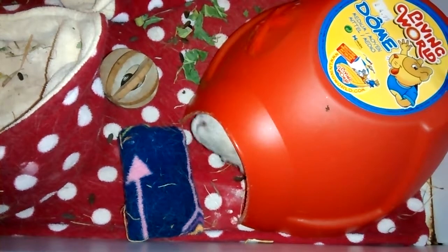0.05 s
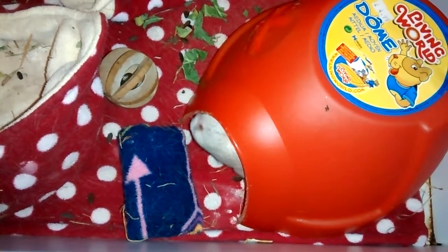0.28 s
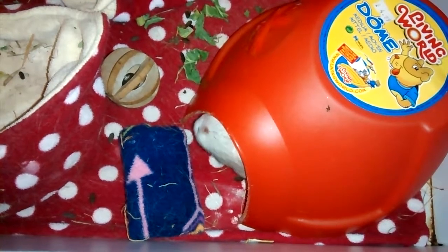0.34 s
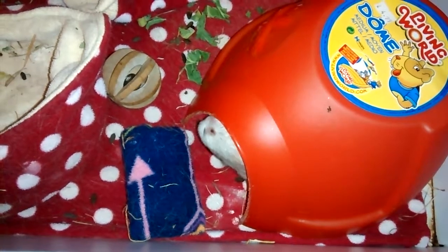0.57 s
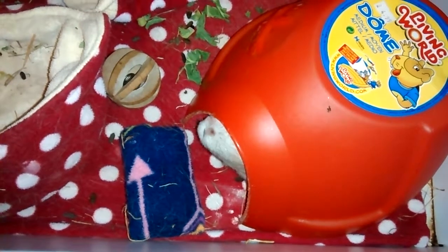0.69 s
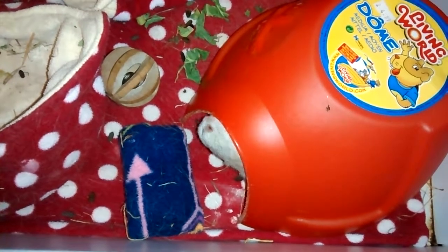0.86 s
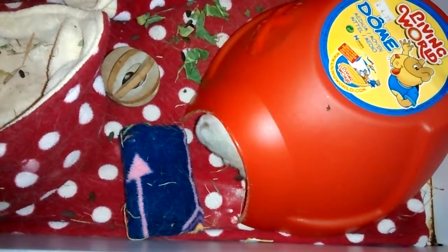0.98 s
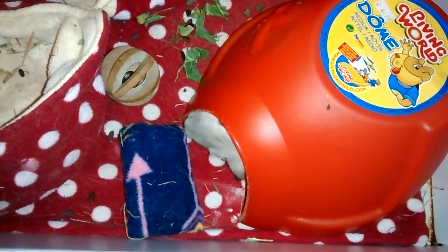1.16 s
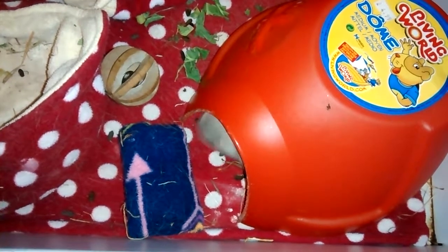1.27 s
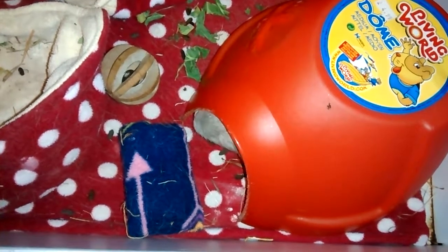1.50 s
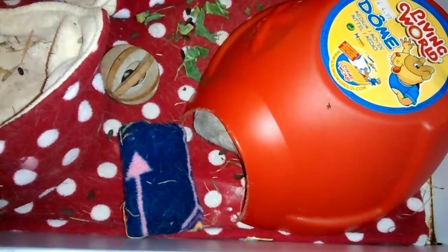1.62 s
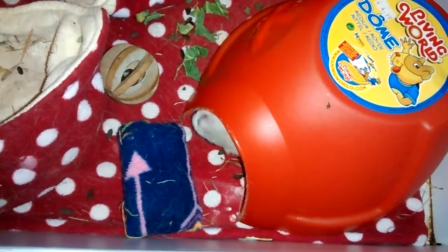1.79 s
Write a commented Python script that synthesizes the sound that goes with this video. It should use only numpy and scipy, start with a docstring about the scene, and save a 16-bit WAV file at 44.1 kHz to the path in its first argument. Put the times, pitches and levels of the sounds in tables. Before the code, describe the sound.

A guinea pig gives four short, low grunts inside a plastic dome in a quiet room.

```python
"""A guinea pig gives four short, low grunts from inside a plastic dome in a quiet room.
Each grunt is a few pops of the throat: a hollow ring near 300 Hz, a brief rasp and a faint tick.
The dome rings along, and both the dome and the room throw the grunts back as echoes.
Behind them are a low appliance hum, soft room noise and the hiss of a nearby camera's microphones."""
import sys
import numpy as np
from scipy import signal
from scipy.fft import rfft, irfft
from scipy.io import wavfile

SR = 44100
rng = np.random.default_rng(int(sys.argv[2]) if len(sys.argv) > 2 else 0)


def log_audio(samples):
    """Write samples as a 16-bit WAV file to the path given in sys.argv[1]."""
    # one column per channel
    frames = np.atleast_2d(samples).T
    # limit to full scale, then quantise
    limited = np.clip(frames, -1, 1)
    pcm = np.round(limited * 32767).astype(np.int16)
    wavfile.write(sys.argv[1], SR, pcm)


N = 81585  # 1.85 seconds


def amp(db):
    """Turns decibels (dB) into a number to multiply a sound by."""
    return 10 ** (np.asarray(db) / 20)


def unit(x):
    """Scales a sound to an average strength (rms) of 1."""
    return x / np.sqrt(np.mean(x ** 2) + 1e-20)


def read(points, hz, column=1):
    """Looks up a frequency in a table, sliding smoothly between the rows."""
    table = np.array(points)
    return np.interp(np.log(hz + 1), np.log(table[:, 0] + 1), table[:, column])


def add(mix, start_s, sound):
    """Adds a sound to the mix at the given time."""
    part = mix[round(start_s * SR):][:len(sound)]
    part += sound[:len(part)]


def pan(x, left_db):
    """Makes two channels: the left is raised by left_db and the right lowered as much."""
    return np.array([x * amp(left_db), x * amp(-left_db)])


def noise(spectrum):
    """Steady noise, with its lows and highs shaped by a table."""
    gain = amp(read(spectrum, np.fft.rfftfreq(N, 1 / SR)))
    return unit(irfft(rfft(rng.standard_normal(N)) * gain, N))


# How loud the hum is. Each row: time in seconds, level in dB.
HUM_LEVELS = [(0.0, -55), (0.426, -49.5), (0.534, -50), (1.092, -49), (1.236, -51.5), (1.812, -52.5),
              (1.85, -52)]

def hum(pitch_hz=45.2, left_lead_s=.0026):
    """An appliance hums on one low note, stronger and earlier on the left."""
    t = np.arange(N) / SR
    tone = unit(np.sin(2 * np.pi * pitch_hz * np.array([t + left_lead_s, t])))
    level_db = np.interp(t, *np.transpose(HUM_LEVELS))
    return pan(amp(level_db), left_db=3.3) * tone


# The tone of the background noise. Each row: frequency in Hz, relative level in dB.
AIR_SPECTRUM = [(20, 10.5), (35, -5), (70, 7), (110, -0.5), (135, 9), (160, 14), (195, 3), (300, 6),
                (500, 1.5), (1000, -6), (1700, -7), (2100, -9.5), (3000, -7.5), (3900, -6.5), (5000, -12.5),
                (6500, -9), (7600, -13), (9000, -11), (15000, -13)]
# How alike its two sides are. Each row: frequency in Hz, likeness (1 the same, -1 opposite).
AIR_LIKENESS = [(60, 0.57), (150, -0.36), (380, -0.48), (950, 0.93), (2380, -0.14), (5980, 0.022),
                (15000, -0.082)]
# Which way it leans. Each row: frequency in Hz, left level minus right level in dB.
AIR_BALANCE = [(60, 6.0), (180, 2.5), (550, 0.5), (1650, -1.0), (4970, -0.5), (15000, 0.0)]
# How its loudness drifts. Each row: time in seconds, change in dB.
AIR_DRIFT = [(0, -0.9), (.2, -1), (.36, 2), (.8, 2.06), (1.15, 2.14), (1.27, -0.04), (1.85, 0.9)]

def room_noise_and_hiss(level_db=-56.5, hiss_drift_share=0.87):
    """Soft room noise and the hiss of two microphones drift gently in loudness."""
    hz = np.fft.rfftfreq(N, 1 / SR)
    left, separate = rfft(noise(AIR_SPECTRUM)), rfft(noise(AIR_SPECTRUM))
    likeness = np.clip(read(AIR_LIKENESS, hz), -1, 1)
    right = likeness * left + np.sqrt(1 - likeness ** 2) * separate
    lean = amp(read(AIR_BALANCE, hz) / 2)
    both = irfft(np.array([left * lean, right / lean]), N)
    room_noise = signal.sosfiltfilt(signal.butter(2, 2000, fs=SR, output="sos"), both)
    hiss = both - room_noise  # the part above 2000 Hz
    drift_db = np.interp(np.arange(N) / SR, *np.transpose(AIR_DRIFT))
    return amp(level_db) * (room_noise * amp(drift_db) + hiss * amp(hiss_drift_share * drift_db))


def ring(t, hz, rise_s, fade_s):
    """A tone that swells quickly and dies away. A fade time is how long it takes to drop 60 dB."""
    swell = (1 - np.exp(-t / rise_s)) ** 2
    fade = np.exp(-np.log(1000) * t / fade_s)
    return -swell * fade * np.sin(2 * np.pi * hz * t)


def puff(t, length_s, spectrum, rise_s=.0004):
    """A small burst of air: noise that rises and falls quickly."""
    shape = (1 - np.exp(-t / rise_s)) * np.exp(-t / length_s)
    strength = np.sqrt(np.mean(shape ** 2)) / shape.max()
    return strength * unit(shape * noise(spectrum)[:len(t)])


# The tone of the breathy rasp. Each row: frequency in Hz, relative level in dB.
RASP_SPECTRUM = [(100, -19), (200, -8), (450, -4), (650, -1), (880, 1), (1050, -2), (1350, 0), (1850, -4),
                 (2300, -19), (3500, -36), (6000, -50)]
# The tone of the brighter tick. Each row: frequency in Hz, relative level in dB.
TICK_SPECTRUM = [(1000, -24), (2200, -7), (3100, 0), (3800, -3), (4500, 0), (5000, -13), (5800, -30),
                 (9000, -55), (15000, -70)]
# The pops that make up the grunts. Each row: start in seconds, throat pitch in Hz, throat level in dB,
# swell time in seconds, throat fade time in seconds, chest level in dB, rasp level in dB, rasp length
# in seconds, mouth pitch in Hz, mouth level in dB, tick level in dB, tick length in seconds.
THROAT_POPS = [ (.2080, 325, -14.5, 0.003, 0.035, -31.5, -34.5, 0.00099, 1520, -42, -46.5, 0.0011),
               (0.2343, 303.3, -8, 0.0064, 0.054, -38, -36, 0.0053, 814, -16.5, -48, 0.0064),
               (0.4043, 303, -11.5, 0.0031, 0.033, -55, -38, 0.0015, 1410, -30, -43.5, 0.00067),
               (0.4219, 369, -18, 0.0021, 0.0367, -28.5, -42.5, 0.0031, 668, -17.5, -60, 0.0017),
               (0.4332, 289.5, -20, .0015, 0.056, -54, -39.5, 0.0033, 1114, -23, -50.5, .002),
               (0.4474, 280, -35, 0.0017, 0.05, -49, -44, 0.0028, 895, -40, -42.5, 0.00067),
               (0.5885, 376, -19.5, 0.0023, 0.032, -30, -40, 0.0054, 1100, -34, -55.5, 0.0023),
               (0.5987, 283.5, -27, 0.0019, .075, -47, -40, .0035, 1328, -30, -49.5, 0.0027),
               (0.7275, 280, -13, 0.002, 0.025, -36, -35, 0.001, 1470, -28, -45.5, 0.0013),
               (0.7416, 315, -29.5, 0.0016, 0.065, -48, -44, 0.0026, 1510, -21.5, -39.5, 0.0026)]

def grunts(low_cut_hz=106, tick_right_db=1, left_lag_s=.0001):
    """Each pop rings the throat, chest and mouth and lets out a puff of rasp with a tick on top."""
    body, mouth, ticks = np.zeros(N), np.zeros(N), np.zeros((2, N))
    t = np.arange(SR // 5) / SR
    for (start, throat_hz, throat_db, swell_s, fade_s, chest_db,
         rasp_db, rasp_s, mouth_hz, mouth_db, tick_db, tick_s) in THROAT_POPS:
        add(body, start, amp(throat_db) * ring(t, throat_hz, swell_s, fade_s))
        add(body, start, amp(chest_db) * ring(t, hz=167, rise_s=swell_s, fade_s=0.061))
        add(mouth, start, amp(mouth_db) * ring(t, mouth_hz, rise_s=.0008, fade_s=.009))
        add(mouth, start, amp(rasp_db) * puff(t, rasp_s, RASP_SPECTRUM))
        # The ticks lean to the right and reach each microphone differently.
        for side, lean_db in zip(ticks, (-tick_right_db, tick_right_db)):
            add(side, start, amp(tick_db + lean_db) * puff(t, tick_s, TICK_SPECTRUM))
    # So small an animal gives off little bass.
    body = signal.sosfilt(signal.butter(2, low_cut_hz, "high", fs=SR, output="sos"), body)
    left, right = pan(body, left_db=1.74) + pan(mouth, left_db=-1.1) + ticks
    clock = np.arange(N) / SR
    late_left = np.interp(clock - left_lag_s, clock, left)
    return np.array([late_left, right])


def echoes(x, bands, delay_s, likeness):
    """Many reflections blur into a fading tail. A likeness of 1 gives both sides the same tail."""
    shared, left, right = rng.standard_normal((3, SR // 2))
    scatter = np.sqrt(likeness) * shared + np.sqrt(1 - likeness) * np.array([left, right])
    hz, t, slices = signal.stft(scatter, SR, nperseg=256)  # split into frequency bands
    fade_rate = np.log(1000) / read(bands, hz, column=2)[:, None]
    fade = np.sqrt(2 * fade_rate / SR) * np.exp(-fade_rate * t)  # same energy, short or long
    slices = slices * amp(read(bands, hz))[:, None] * fade
    tail = signal.istft(slices, SR, nperseg=256)[1]
    late_tail = np.pad(tail, ((0, 0), (round(delay_s * SR), 0)))
    return signal.fftconvolve(x, late_tail, axes=1)[:, :N]


# Echoes inside the dome. Each row: frequency in Hz, level in dB, fade time in seconds.
DOME_ECHOES = [(151, -52, 0.021), (343, -38, 0.019), (710, -6.5, 0.041), (1440, -3.5, 0.068),
               (4070, -11, 0.037)]
# The notes the dome rings at. Each row: pitch in Hz, level in dB, fade time in seconds.
DOME_NOTES = [(341, -19, 0.66), (574, -3.5, 0.052), (694, -9, 0.072), (918, -9.5, 0.051), (1236, -8, 0.09),
              (1630, -19, 0.28)]

def dome(voice):
    """The plastic dome scatters the voice in quick reflections and rings at its own notes."""
    answer = echoes(voice, DOME_ECHOES, delay_s=.002, likeness=1.0)
    for hz, level_db, fade_s in DOME_NOTES:
        width_hz = np.log(1000) / np.pi / fade_s  # a narrower peak rings for longer
        ringing = signal.lfilter(*signal.iirpeak(hz, hz / width_hz, SR), voice)
        answer = answer + amp(level_db) * ringing
    return answer


# Echoes of the room. Each row: frequency in Hz, level in dB, fade time in seconds.
ROOM_ECHOES = [(147, -7, 0.22), (294, -13, 0.15), (437, -13.5, 0.24), (780, -8, 0.19), (1500, -11, 0.15),
               (4040, -9.5, 0.23)]

def room(voice):
    """The room throws the voice back a little later, with a wider, longer tail."""
    return echoes(voice, ROOM_ECHOES, delay_s=0.007, likeness=0.4)


def scene():
    """The guinea pig grunts in its dome and the room answers, over hum and hiss."""
    voice = grunts()
    voice = voice + dome(voice)
    return voice + room(voice) + hum() + room_noise_and_hiss()


def record(dry, notch_hz=2510, notch_width_hz=190, notch_db=-18, top_hz=15700):
    """The camera turns down one narrow band of frequencies and cuts off the highest treble."""
    hz = np.fft.rfftfreq(N, 1 / SR)
    dip_db = notch_db * np.exp(-((hz - notch_hz) / notch_width_hz) ** 2)
    notched = irfft(rfft(dry) * amp(dip_db), N)
    treble_cut = signal.firwin(511, top_hz, window=("kaiser", 9), fs=SR)
    return signal.oaconvolve(notched, treble_cut[None], "same")


dry = scene()
out = record(dry)
log_audio(out)
```